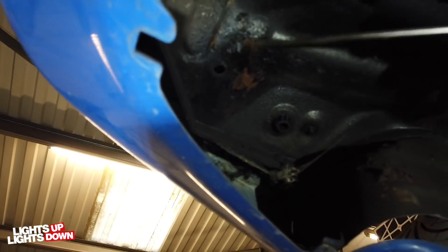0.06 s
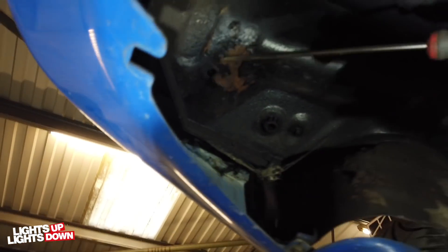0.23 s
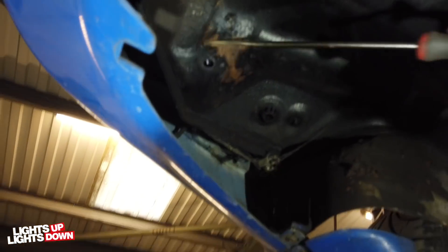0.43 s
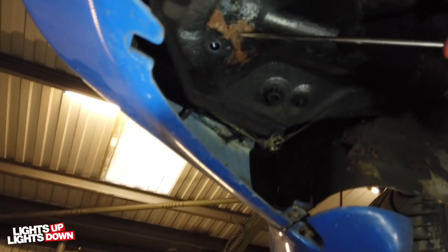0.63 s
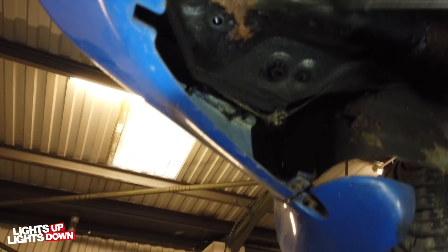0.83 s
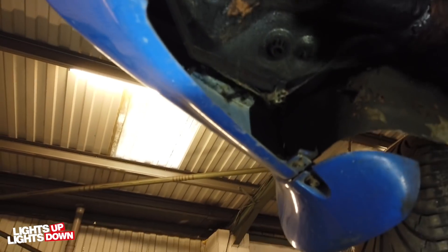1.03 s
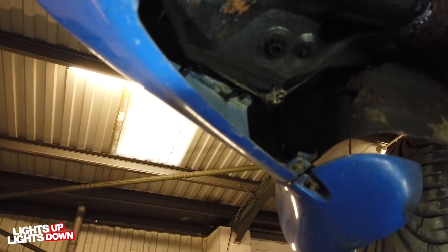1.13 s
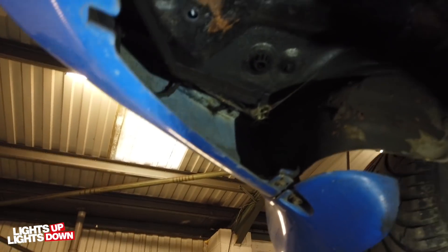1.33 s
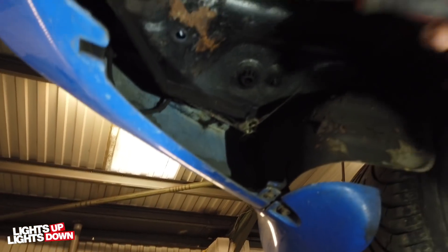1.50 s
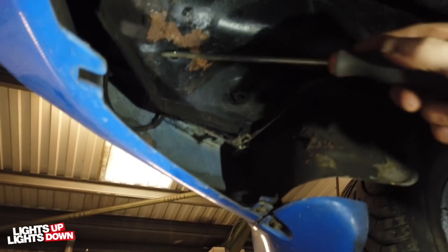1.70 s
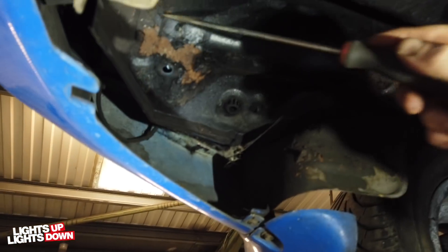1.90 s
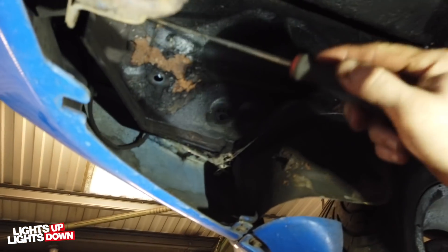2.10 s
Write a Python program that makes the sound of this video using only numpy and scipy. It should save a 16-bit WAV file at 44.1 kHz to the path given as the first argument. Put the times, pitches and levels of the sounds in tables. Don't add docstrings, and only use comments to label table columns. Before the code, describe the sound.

A screwdriver scrapes rusty sheet metal and underseal inside a car's wheel arch in short uneven rasps, then knocks a bracket edge, scrapes briefly and drops flakes; close microphone, echoing workshop with low rumble.

```python
import sys
import numpy as np
from scipy import signal
from scipy.fft import rfft, irfft
from scipy.io import wavfile
from scipy.ndimage import uniform_filter1d

SR = 44100
rng = np.random.default_rng(int(sys.argv[2]) if len(sys.argv) > 2 else 0)


def dump_mix(stems):
    frames = np.atleast_2d(stems).T
    limited = np.clip(frames, -1, 1)
    pcm = np.round(limited * 32767).astype(np.int16)
    wavfile.write(sys.argv[1], SR, pcm)


def invert_db(level):
    return 10 ** (np.asarray(level, dtype=float) / 20)


N = 94815
T = np.arange(N) / SR

# frequency_hz, level_db, t60_s
PANEL_MODES = [(482.4, -0.5, .12), (543, -3.5, 0.093), (770, -9.5, 0.11), (820, -19, 0.08),
               (960.6, -2, 0.11), (1058, -3.5, 0.076), (1176, -2.5, 0.094), (1366, -10.5, 0.11),
               (1470, -29, 0.03), (1753, -0.5, 0.056), (1931, -4.5, 0.099), (2051, -3, 0.045),
               (2288, -17, 0.1), (2990, -3, 0.045)]
# frequency_hz, level_db, t60_s
EDGE_MODES = [(473, -2, 0.17), (557, -2, 0.1), (1083, -16, 0.27), (1176, -10, 0.13), (1284, -13, 0.045),
              (1790, -11.5, 0.099), (2203, -14.5, 0.25), (2297, 2, 0.035), (2860, -4, 0.04),
              (3320, -12.5, 0.038), (4170, -24, 0.035), (5570, -20, 0.026), (7040, -12, 0.024)]
# frequency_hz, level_db (per Hz)
SHEET_SPECTRUM = [(230, -23), (500, -1), (690, -18.5), (1000, 0.5), (2300, -6), (2650, -14.5), (3100, -6),
                  (7000, -26.5)]


def unit(x):
    return x / np.sqrt(np.mean(x ** 2))


def colour(x, points):
    hz, db = np.array(points).T
    bins_hz = np.maximum(np.arange(N // 2 + 1) * SR / N, 1)
    gain = invert_db(np.interp(np.log(bins_hz), np.log(hz), db))
    return irfft(rfft(x) * gain, N)


def shaped(x, points):
    return colour(x, points) / np.std(colour(rng.standard_normal(N), points))


def walk(rate_per_s):
    k = int(SR / rate_per_s)
    steps = np.repeat(rng.standard_normal(N // k + 1), k)
    return 1.8 * uniform_filter1d(uniform_filter1d(steps, k), k)[:N]


def echo(x, t60_s):
    h = rng.standard_normal(SR) * invert_db(-60 * T[:SR] / t60_s)
    return signal.fftconvolve(x, h / np.sqrt(np.sum(h ** 2)))[:N]


def low_pass(x, hz):
    return signal.sosfilt(signal.butter(2, hz, fs=SR, output="sos"), x)


def clicks(per_s, spread_db):
    happens = rng.random(N) < per_s / SR
    size = invert_db(spread_db * rng.exponential(size=N))
    return unit(happens * rng.choice([-1, 1], N) * size)


def effort(rows):
    total = 0
    for peak_s, rise_s, fall_s, level_db in rows:
        away = np.maximum((peak_s - T) / rise_s, (T - peak_s) / fall_s)
        total = total + invert_db(level_db - 20 * away ** 1.76)
    return total


def ring(x, modes, spot_db, damp=1, cut_hz=275):
    out, power = 0, 0
    for k, (hz, db, t60_s) in enumerate(modes):
        pole = np.exp(2j * np.pi * hz / SR - np.log(1000) / (t60_s * damp * SR))
        coupled = x * invert_db(spot_db * walk(14.44))
        sign = (-1) ** (k // 2)
        out = out + sign * invert_db(db) * signal.lfilter([1], [1, -pole], coupled).imag
        power += invert_db(2 * db)
    radiates = signal.butter(3, cut_hz, "high", fs=SR, output="sos")
    return signal.sosfilt(radiates, out) / np.sqrt(power)


def scrape(pushes, modes, db):
    # frequency_hz, level_db (per Hz)
    shell_boom = [(60, -24), (150, 0), (260, -4), (400, -37)]
    slips = clicks(3000, 1.5) * effort(pushes)
    modal = invert_db(db) * ring(slips, modes, spot_db=2.5, damp=0.63)
    dense = invert_db(-6) * shaped(slips, SHEET_SPECTRUM)
    return modal + dense + invert_db(-22) * shaped(slips, shell_boom)


def panel_scrape():
    # peak_s, rise_s (per 20 dB), fall_s (per 20 dB), pressure_db
    pushes = [(.240, .032, .04, -27), (.278, .05, .04, -18), (.320, .03, .015, -19), (.432, .028, .03, -26),
              (.468, .035, .032, -22), (.604, .015, .025, -25), (.630, .03, .02, -19),
              (.704, .03, .025, -22), (.722, .015, .01, -25), (.811, .035, .014, -24),
              (.856, .028, .02, -21), (.889, .02, .028, -25), (.979, .045, .009, -25),
              (1.106, .055, .025, -23), (1.134, .018, .018, -16), (1.166, .03, .024, -20),
              (1.229, .005, .018, -25), (1.248, .005, .018, -26)]
    return scrape(pushes, PANEL_MODES, -22)


def edge_scrape():
    # peak_s, rise_s (per 20 dB), fall_s (per 20 dB), pressure_db
    pushes = [
        (1.685, .025, .025, -25),
        (1.708, .013, .016, -14),
        (1.724, .015, .028, -22),
    ]
    return scrape(pushes, EDGE_MODES, -25.5)


def grit():
    # peak_s, rise_s (per 20 dB), fall_s
    # (per 20 dB), level_db
    slides = [(.226, .016, .05, -37), (.275, .06, .055, -31), (.312, .03, .028, -36),
              (.418, .016, .03, -38), (.446, .035, .052, -32), (.594, .016, .014, -28),
              (.625, .035, .028, -35), (.686, .014, .03, -37), (.714, .035, .015, -34),
              (.780, .013, .03, -35), (.810, .025, .02, -28), (.860, .06, .06, -41), (.935, .003, .01, -41),
              (.970, .035, .02, -41), (1.022, .01, .032, -44), (1.118, .05, .015, -33),
              (1.134, .012, .02, -31), (1.160, .03, .035, -38), (1.228, .016, .018, -31),
              (1.247, .006, .022, -30), (1.340, .022, .05, -48), (1.512, .01, .012, -51),
              (1.656, .01, .018, -37), (1.695, .045, .06, -33), (1.708, .01, .016, -25),
              (1.870, .004, .03, -34), (1.931, .01, .022, -44), (1.975, .01, .018, -53)]
    # frequency_hz, level_db (per Hz)
    rust_spectrum = [(1500, -18.5), (3100, -3), (5500, -12), (8800, -8), (10500, 0), (11800, -11.5),
                     (16000, -28)]
    chatter = invert_db(0.5 + 1.8 * walk(90))
    crackle = unit(colour(clicks(9800, 2.5), rust_spectrum))
    return crackle * effort(slides) * chatter


def contacts(rows):
    push = 0
    for start_s, level_db, contact_ms in rows:
        phase = np.clip((T - start_s) * 1000 / contact_ms, 0, 1)
        push = push + invert_db(level_db) * np.sin(np.pi * phase) / (contact_ms * SR / 1000)
    return push + invert_db(-7) * echo(push, 0.033)


def strike(rows, modes, spot_db, cut_hz=275):
    push = contacts(rows)
    clack = invert_db(17) * shaped(echo(push, 0.11), SHEET_SPECTRUM)
    return ring(push, modes, spot_db, cut_hz=cut_hz) + clack


def panel_knocks():
    # start_s, level_db, contact_ms
    rows = [
        (1.018, -11.5, .12),
        (1.0222, -11.5, 0.2),
        (1.226, -14.5, 0.074),
    ]
    return strike(rows, PANEL_MODES, 0.64)


def edge_knocks():
    # start_s, level_db, contact_ms
    rows = [
        (.095, -36, 0.73),
        (1.321, -9, 0.11),
        (1.3252, -7.5, 0.22),
        (1.511, -27.5, 0.072),
        (1.617, -21.5, 0.17),
        (1.675, -18, 0.12),
    ]
    return strike(rows, EDGE_MODES, 0.84)


def falling_flakes():
    # start_s, level_db, contact_ms
    rows = [
        (1.471, -13, 2.5),
        (1.867, -11, .06),
        (1.878, -17, .12),
        (1.928, -25, .05),
        (1.945, -25, 0.63),
        (1.974, -28.5, .06),
    ]
    # frequency_hz, level_db, t60_s
    flake_modes = [(278, -2, 0.049), (563, 0.5, 0.033), (851, 2.5, 0.048), (1360, -15, 0.049),
                   (1597, -1, 0.038), (2150, 5.5, 0.011), (2780, 3.5, 0.024), (3700, -19, 0.041),
                   (7000, -5, 0.018)]
    return strike(rows, flake_modes, 1.3, cut_hz=153)


def reflections(near):
    arch = invert_db(-10) * echo(near, 0.013)
    underbody = invert_db(-18.5) * echo(near, 0.44)
    room = invert_db(-10) * echo(low_pass(near, 2580), 0.85)
    return arch + underbody + room


def shop():
    # frequency_hz, level_db (per Hz)
    shop_spectrum = [(36, -4), (100, -5.5), (135, -10.5), (320, -25.5), (2500, -32), (3600, -37),
                     (7000, -44), (16000, -48.5)]
    base = colour(rng.standard_normal(N), shop_spectrum)
    low = low_pass(base, 70)
    busy = np.clip(np.minimum((T - .15) / 0.083, (2.0 - T) / 0.39), -.5, 1)
    swell = invert_db(6.5 * busy + 0.5 * walk(5.3))
    return invert_db(-42) * (base + low * (swell - 1)) / np.std(base)


def stereo(mid):
    # frequency_hz, level_db
    width_spectrum = [(300, -24), (1000, -25.5), (1600, -13), (2500, -1), (16000, -1)]
    sway = 1.5 * walk(22)
    diffuse = echo(mid * np.cos(sway), 0.025) + echo(mid * np.sin(sway), 0.025)
    side = colour(diffuse, width_spectrum)
    return np.array([mid + side, mid - side])


def scene():
    near = panel_scrape() + edge_scrape() + grit()
    near = near + panel_knocks() + edge_knocks() + falling_flakes()
    return stereo(near + reflections(near) + shop())


def roll_off(x):
    return signal.sosfilt(signal.butter(12, 16840, fs=SR, output="sos"), x)


def record(dry):
    return roll_off(dry)


dry = scene()
out = record(dry)
dump_mix(out)
```